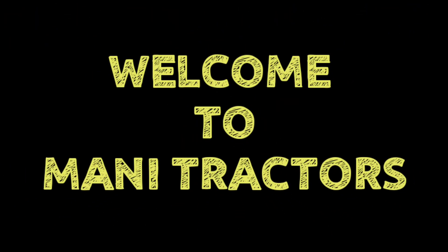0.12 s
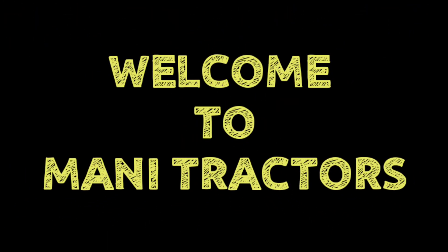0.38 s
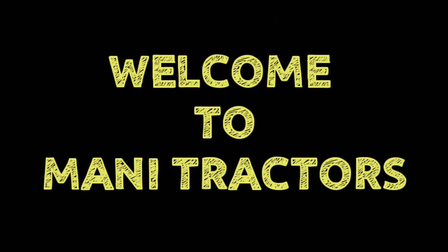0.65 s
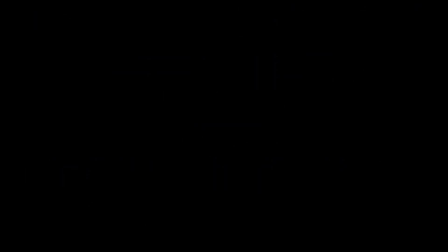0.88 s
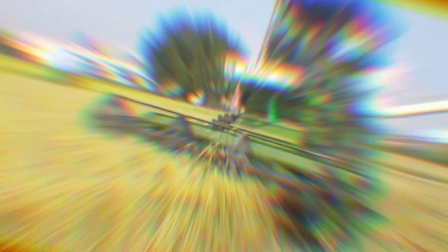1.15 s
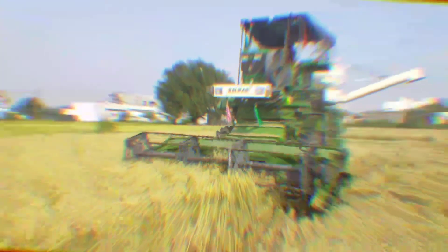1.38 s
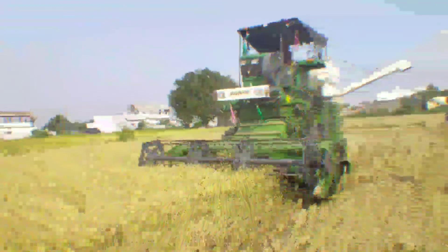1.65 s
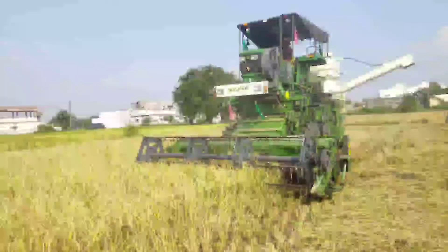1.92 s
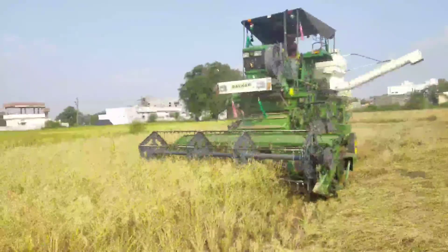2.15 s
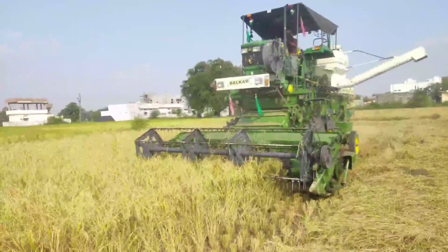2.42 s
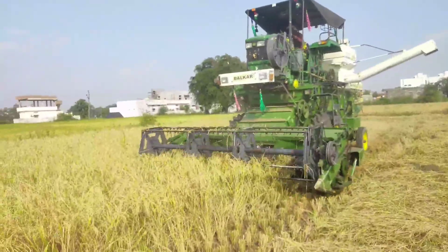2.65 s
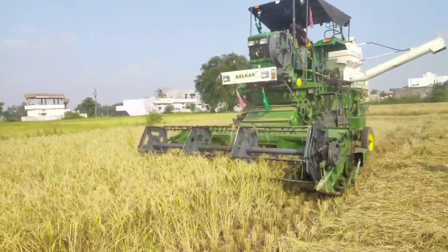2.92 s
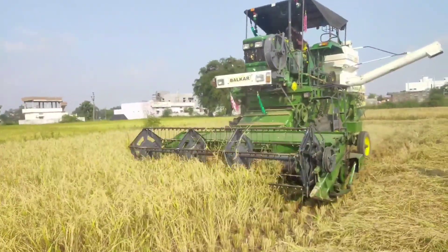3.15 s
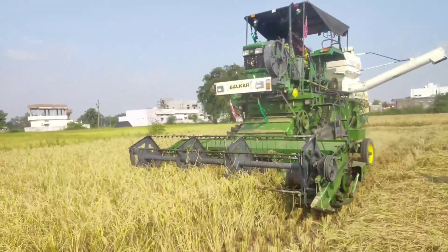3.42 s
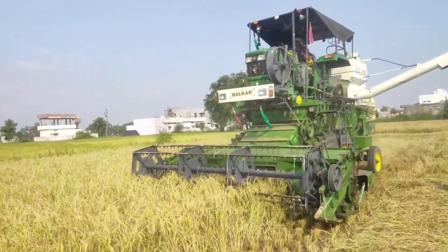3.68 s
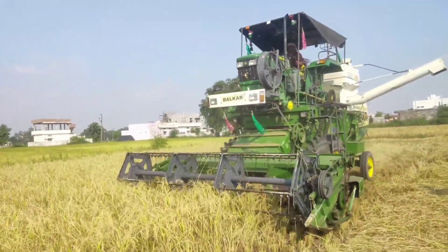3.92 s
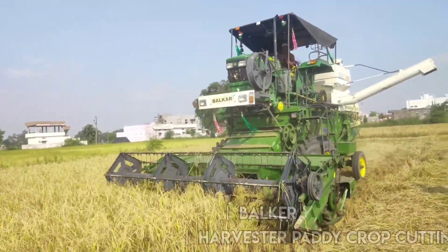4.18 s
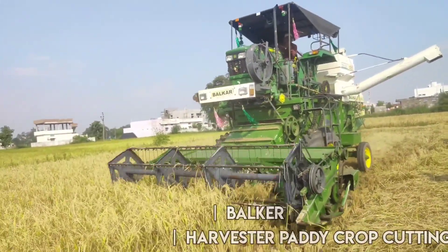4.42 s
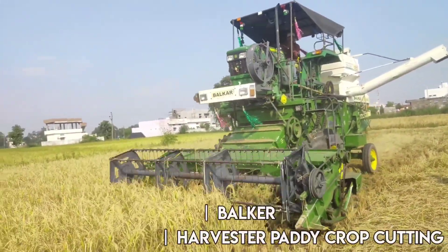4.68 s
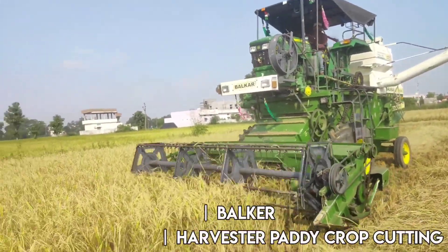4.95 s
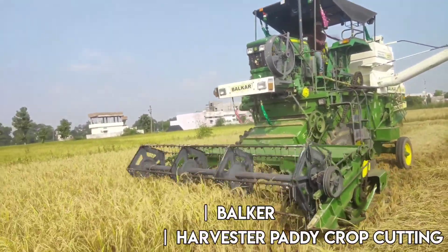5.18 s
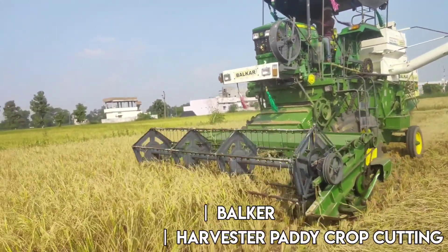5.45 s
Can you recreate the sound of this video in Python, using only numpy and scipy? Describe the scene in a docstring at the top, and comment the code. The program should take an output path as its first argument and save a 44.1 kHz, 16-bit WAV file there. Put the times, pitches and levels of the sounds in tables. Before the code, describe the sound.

The first quarter second is silent, then a combine harvester working close by in an open field fades in smoothly, reaching full level around 1.9 seconds. A low, slightly wavering diesel drone and belted-shaft hum lie under a broad, bass-heavy roar of drum and fans. Over it, a knife shears dry straw about thirteen times a second, each uneven stroke a quick swell of crackle with a crunchy, briefly ringing metallic cut; harder cuts stand out from about 1.9 seconds onward. A sheet-metal panel whines around 1.4 to 1.5 kilohertz, with tiny squeaks following the strokes. Louder, upward-gliding squeaks appear occasionally, then crowd together from 4 seconds to the end. Around 5.3 seconds a soft, mid-pitched tone hums for roughly a quarter second. Soft ground gives the close outdoor sound a faint hollow coloration, and the highest treble is cut off. The machine is still running at the end, about 5.6 seconds.

```python
"""Combine harvester close by

A diesel engine sums straying sines; drum and fans roar as noise shaped by a spectrum; a knife shears
straw in swelling crackle and ringing cuts; a metal panel whines and squeaks; a soft tone hums briefly.
Soft ground returns an inverted echo that combs the roar, straw and knife. The whole scene fades in."""
import sys
import numpy as np
from scipy import signal
from scipy.fft import rfft, irfft
from scipy.io import wavfile
from scipy.ndimage import uniform_filter1d

SR = 44100
rng = np.random.default_rng(int(sys.argv[2]) if len(sys.argv) > 2 else 0)


def ratio(d):
    """dB to gain"""
    e = np.asarray(d, float) / 20
    return 10 ** e


def digitize_waveform(pressure):
    """Quantize a signal to 16-bit integers and store it at the path in sys.argv[1].

    Rows of a 2-D input are taken as channels; values are limited to [-1, 1].
    """
    field = np.atleast_2d(pressure).T
    bounded = np.clip(field, -1, 1)
    quanta = np.round(bounded * 32767).astype(np.int16)
    wavfile.write(sys.argv[1], SR, quanta)


N = 245637
TIME = np.arange(N) / SR  # s

KNIFE_HZ, KNIFE_START_S = 13.255, 0.056  # strokes per second, first stroke
STROKES_S = np.arange(KNIFE_START_S, N / SR - 0.05, 1 / KNIFE_HZ)

# Spectrum of straw sheared and dragged. Each row: frequency in Hz, relative level in dB per Hz.
STRAW_SPECTRUM = [(1060, -29.5), (1800, 4), (2020, -5), (2400, 3), (2850, 0), (3390, -5), (5040, -10),
                  (6100, -7), (6700, -3.5), (7200, -8), (7640, -11), (7950, -31), (8300, -37),
                  (9000, -36.5)]


def evened(x):
    """Normalises mean power: scales to rms 1."""
    return x / np.sqrt(np.mean(x ** 2) + 1e-20)


def read(points, hz):
    """Interpolates a spectrum along a logarithmic frequency axis, on which pitch is even."""
    f, value = np.transpose(points)
    return np.interp(np.log(hz + 1), np.log(f + 1), value)


def follow(points, s):
    """Interpolates a level in dB linearly over time."""
    return np.interp(s, *np.transpose(points))


def add(mix, s, sound):
    """Superposes a sound on the mix, starting at time s."""
    part = mix[round(s * SR):][:len(sound)]
    part += sound[:len(part)]


def coloured(x, spectrum):
    """Linear filtering: multiplies the Fourier transform of x by a spectrum."""
    hz = np.fft.rfftfreq(len(x), 1 / SR)
    return irfft(rfft(x) * ratio(read(spectrum, hz)), len(x))


def wander(rate_hz):
    """First-order low-pass noise of rms 1: a chance level with a short memory."""
    pole = np.exp(-2 * np.pi * rate_hz / SR)
    return evened(signal.lfilter([1], [1, -pole], rng.standard_normal(N)))


def fuzzy_tone(hz, width):
    """Narrow-band noise of rms 1: a twofold complex pole, shifted up to the resonance."""
    r = np.exp(-np.pi * width / SR)
    white = rng.standard_normal(N) + 1j * rng.standard_normal(N)
    slow = signal.lfilter([1], np.convolve([1, -r], [1, -r]), white)
    return evened((slow * np.exp(2j * np.pi * hz * TIME)).real)


def hum():
    """A pure tone under a flat-topped envelope: soft and steady for a moment, with rounded ends."""
    hz, db, middle_s, half_s = 700.0, -29.0, 5.28, 0.14  # db is rms while held
    held = np.exp(-((TIME - middle_s) / half_s) ** 4)
    return np.sqrt(2) * ratio(db) * held * np.sin(2 * np.pi * hz * TIME)


def roar(patchy_db=1.14):
    """Random short-time spectra: noise whose spectral patches drift at random above a steady bass."""
    # Drum, fans and exhaust before the ground echo.
    # Each row: frequency in Hz, relative level in dB per Hz.
    roar_spectrum = [(25, -30), (45, -53.5), (70, -18.5), (120, -3), (175, -5), (260, -10.5), (420, -13),
                     (600, -14), (900, -14), (1250, -16.5), (1600, -16), (2100, -23), (3000, -28.5),
                     (4500, -40.5), (8000, -54)]
    level_db = -17.5  # rms
    hz = np.fft.rfftfreq(2048, 1 / SR)
    real, imaginary, patches = rng.standard_normal((N // 512 + 5, len(hz), 3)).T
    patches = uniform_filter1d(patches, size=12, axis=0)  # over frequency
    patches = evened(uniform_filter1d(patches, size=6, axis=1))  # over time
    hz = hz[:, None]
    drift_db = patchy_db * patches * np.clip(hz / 600, 0, 1)  # the bass runs steady
    z = (real + 1j * imaginary) * ratio(read(roar_spectrum, hz) + drift_db)
    noise = signal.istft(z, nperseg=2048, noverlap=1536)[1][:N]
    return ratio(level_db) * evened(noise)


def engine():
    """Steady tones of the engine and belted shafts: sines whose random-walk phase broadens each line."""
    # Lines of the crankshaft and of shafts belted to it.
    # Each row: multiple of the engine cycle, level in dB rms, line width in Hz.
    shaft_lines = [(0.97, -52.5, 3.7), (2.04, -64.5, 0.63), (3, -51, 0.35), (3.98, -38, 0.56),
                   (5.425, -36.5, 3.1), (6.22, -36.5, 4.7), (7.435, -34.5, 3.26), (7.99, -30.5, 2.25),
                   (10.01, -40, 2.2), (17.98, -35.5, 1.53), (18.87, -38.5, 1.24), (19.21, -33, 1.72),
                   (32.04, -57.5, 3)]
    cycle_hz = 21.67  # one four-stroke cycle
    out = np.zeros(N)
    for multiple, db, width in shaft_lines:
        stray = np.cumsum(rng.standard_normal(N)) * np.sqrt(2 * np.pi * width / SR)
        turns = multiple * cycle_hz * TIME + rng.random()
        out += ratio(db) * np.sqrt(2) * np.sin(2 * np.pi * turns + stray)
    return out


def strokes(rise=0.063, fall=0.47, alternate_db=2.0, uneven_db=3.5):
    """Amplitude modulation: effort swells quickly at each stroke, every other stroke a little stronger."""
    # rise and fall are fractions of a stroke
    turns = np.maximum(TIME - KNIFE_START_S, 0) * KNIFE_HZ
    which, u = turns.astype(int), turns % 1
    uneven = rng.standard_normal(which[-1] + 1)[which]
    size_db = alternate_db * (which % 2) + uneven_db * uneven
    return ratio(size_db) * (np.exp(-u / fall) + np.exp(-(1 - u) / rise))


def panel(effort, steady=2.5, rise_hz_per_s=350.0):
    """Modes of sheet metal kept ringing by the shaking frame, and rubbing squeaks that glide upward."""
    # Modes of the whining panel. Each row: frequency in Hz, pole bandwidth in Hz, relative level in dB.
    panel_modes = [(1400, 15.5, 1), (1430, 25, 2.5), (1492, 31, 1.5), (1527, 44, -1), (1640, 38, -5.5)]
    # How hard the panel is shaken. Each row: time in seconds, level in dB rms.
    shake_levels = [(.2, -22), (.6, -28), (2.2, -29.5), (3.5, -28), (5, -26.5), (5.3, -24), (5.57, -23.5)]
    # The loudest squeaks of rubbing metal.
    # Each row: middle in seconds, peak level in dB, frequency in Hz, time to fall to 1/e in seconds.
    loud_squeaks = [(1.261, -18.5, 1437, .017), (1.868, -15.5, 1460, 0.012), (3.059, -17, 1479, 0.025),
                    (3.2544, -15.5, 1455, 0.011), (3.64, -17, 1400, .015), (3.9973, -14, 1487, 0.014),
                    (4.264, -17.5, 1463, 0.016), (4.3002, -13, 1488, .018), (4.4127, -19.5, 1858, .022),
                    (4.4653, -16, 1410, 0.014), (4.7332, -13, 1466, 0.017), (4.8902, -14, 1488, 0.02),
                    (5.0584, -17, 1388, 0.033), (5.141, -18, 1422, .016), (5.188, -15, 1410, .026),
                    (5.2786, -13, 1425, 0.024), (5.335, -17, 1463, 0.024), (5.426, -13, 1415, .03),
                    (5.475, -11, 1460, .015), (5.5004, -17.5, 1480, 0.02)]
    ring = evened(sum(ratio(db) * fuzzy_tone(hz, width) for hz, width, db in panel_modes))
    out = ring * evened(steady + effort) * ratio(follow(shake_levels, TIME))

    # a faint squeak after each stroke, its level relative to the shaking
    faint_db, spread_db, lag_s, faint_half_s = 5, 3.5, 0.015, 0.014
    late, size, detune = rng.standard_normal((len(STROKES_S), 3)).T
    faint_s = STROKES_S + lag_s * (1 + late.clip(-1, 2))
    peak_db = follow(shake_levels, faint_s) + faint_db + spread_db * size.clip(-2, 1)
    mode = rng.integers(0, len(panel_modes), len(faint_s))
    faint_hz = np.transpose(panel_modes)[0][mode] * (1 + 0.0071 * detune)
    faint_squeaks = [(*row, faint_half_s) for row in zip(faint_s, peak_db, faint_hz)]

    t = np.arange(-2400, 2400) / SR
    for s, db, hz, half_s in loud_squeaks + faint_squeaks:
        swell = np.exp(-(t / half_s) ** 2)
        glide = np.sin(2 * np.pi * (hz + rise_hz_per_s * t / 2) * t)
        add(out, s + t[0], ratio(db) * swell * glide)
    return out


def straw(effort, steady=2.5, gusty_db=1.4, grain_db=2.5, patchy_db=1.5):
    """Dense impulsive noise: stalks crackle, swelling with each stroke, as spectral patches flicker."""
    # How much crop passes the knife. Each row: time in seconds, level in dB before gusts and echo.
    crop_load = [(.2, -28.5), (2, -24.5), (3.2, -26.5), (4.1, -24.5), (5.2, -24), (5.57, -25)]
    grains = ratio(grain_db * np.minimum(rng.exponential(1, N), 5)) * rng.standard_normal(N)
    z = signal.stft(coloured(grains, STRAW_SPECTRUM), nperseg=512)[2]
    patches = uniform_filter1d(rng.standard_normal(z.T.shape), size=4, axis=0)  # over time
    patches = evened(uniform_filter1d(patches, size=5, axis=1))  # over frequency
    crackle = signal.istft(z * ratio(patchy_db * patches.T), nperseg=512)[1][:N]
    level_db = follow(crop_load, TIME) + gusty_db * wander(23.0)
    return evened(crackle) * evened(steady + effort) * ratio(level_db)


def knife(effort, per_s=45.0, rattle_db=-41.0, spread_db=4.0):
    """Modal impact: cuts crunch and ring the bar's modes unequally; loose parts tinkle with strokes."""
    # Modes of the knife bar and its guards.
    # Each row: frequency in Hz, relative level in dB, time to decay by 60 dB in seconds.
    bar_modes = [(2364, 2.5, 0.025), (2895, 8.5, 0.026), (3080, 0, 0.057), (3650, -1, 0.036),
                 (4310, -6, 0.026), (4700, -9.5, 0.054), (5130, -3.5, .03), (5800, -6, .03),
                 (6070, -5, 0.024), (6770, 1.5, 0.026), (6950, -0.5, 0.018), (7250, -14, 0.024),
                 (7300, -7.5, 0.027), (7850, -10.5, 0.024)]
    # The hardest cuts. Each row: start in seconds, level in dB that scales both ring and crunch.
    hard_cuts = [(1.928, -9), (2.2248, -8), (2.4604, -10), (2.6432, -9), (2.9252, -6), (2.9964, -8.5),
                 (3.1398, -11), (3.302, -8.5), (3.3852, -9), (3.5834, -10.5), (3.967, -6.5), (4.0607, -6.5),
                 (4.1999, -8.5), (4.369, -6.5), (4.667, -8), (5.0887, -7.5), (5.2446, -10), (5.4084, -9.5),
                 (5.4783, -11)]
    t = np.arange(round(0.08 * SR)) / SR
    hz, mode_db, t60 = np.transpose(bar_modes)[:, :, None]
    onset = 1 - np.exp(-t / 0.0019)
    rings = ratio(mode_db - 60 * t / t60) * onset * np.sin(2 * np.pi * hz * t)

    # random taps on every mode: per_s a second at unit effort
    modes = len(bar_modes)
    tap_size = ratio(2.9 * rng.exponential(1, (modes, N)).clip(0, 4))
    taps = tap_size * (rng.random((modes, N)) < effort * per_s / SR)
    rattle = signal.oaconvolve(taps, rings, axes=1)[:, :N].sum(0)
    out = ratio(rattle_db) * evened(rattle)

    # the ordinary cut that comes with every stroke
    cut_db, cut_spread_db, scatter_s = -16, 3, 0.015
    late, size = rng.standard_normal((len(STROKES_S), 2)).T.clip(-2, 1.5)
    ordinary_cuts = list(zip(STROKES_S + scatter_s * late, cut_db + cut_spread_db * size))

    bright_db, bright_spread_db = -2.5, 2.5  # tilt of a ring per octave
    crunch = (1 - np.exp(-t / 0.0024)) * np.exp(-t / 0.017)
    for s, db in ordinary_cuts + hard_cuts:
        tilt_db = bright_db + bright_spread_db * np.clip(rng.standard_normal(), -1.5, 1.5)
        uneven_db = spread_db * rng.standard_normal((modes, 1)).clip(-2, 1.3)
        struck = ratio(uneven_db + tilt_db * np.log2(hz / 4000))
        ring = (struck * rings).sum(0)
        noise = crunch * evened(coloured(rng.standard_normal(len(t)), STRAW_SPECTRUM))
        add(out, s, ratio(db) * (ratio(-9.0) * ring / abs(ring).max() + ratio(-11.0) * noise))
    return out


def ground(x):
    """Interference: at grazing angles soft ground inverts the echo, which carves a stretched comb."""
    # The machine draws near and turns. Each row: time in seconds, first echo notch in Hz,
    # strength of the echo as a factor, engine side facing from 0 to 1.
    machine_path = [(.2, 512, 1.1, 0.96), (1.2, 565, 0.77, 0.95), (2, 585, 0.79, 0.37),
                    (3, 594, 0.65, 0.46), (4.2, 591, 0.88, 0.09), (5.57, 554, 0.86, .1)]
    # What the ground returns. Each row: frequency in Hz, share of the sound from 0 to 1.
    ground_share = [(150, 0.2), (600, 0.66), (1250, 0.7), (1900, 0.19), (3500, 0), (6000, 0.04)]
    hz, t, z = signal.stft(x, SR, nperseg=1024, noverlap=768)
    hz = hz[:, None]
    s, *columns = np.transpose(machine_path)
    notch_hz, strength, facing = (np.interp(t, s, column) for column in columns)
    share = np.clip(read(ground_share, hz) * strength, 0, 0.95)
    echo = share * np.exp(-2j * np.pi * (hz / notch_hz) ** 0.941)  # exponent below 1 stretches the comb
    # from facing away to facing fully, the bass gains 2 dB and the high treble 5 dB
    bass_db = 2 * np.clip((1200 - hz) / 900, 0, 1)
    sheen_db = 5 * np.clip((hz - 4500) / 2000, 0, 1)
    facing_db = (facing - 0.5) * (bass_db + sheen_db)
    return signal.istft(z * (1 - echo) * ratio(facing_db), SR, nperseg=1024, noverlap=768)[1][:N]


def scene():
    """Superposition: broad machine noise with its ground echo, plus the tones without it."""
    effort = strokes()
    broad = ground(roar() + straw(effort) + knife(effort))
    return (broad + engine() + hum() + panel(effort))[None]


def fade(start_s=0.23, length_s=1.688, curve=1.402):
    """Power-law gain: a fade-in from silence, a little slower than linear at first."""
    return np.clip((TIME - start_s) / length_s, 0, 1) ** curve


def band_limit(x):
    """A steep low-pass at the top of the band."""
    return signal.sosfilt(signal.butter(12, 8460, fs=SR, output="sos"), x)


def record(dry):
    """Band limiting by a steep low-pass, soft saturation toward full scale, then the fade."""
    low_pass = signal.firwin(767, 8290, window=("kaiser", 9), fs=SR)  # edge in Hz
    limited = signal.oaconvolve(dry, low_pass[None], "same")
    finished = np.tanh(limited) * fade()
    return band_limit(finished)


dry = scene()
out = record(dry)
digitize_waveform(out)
```